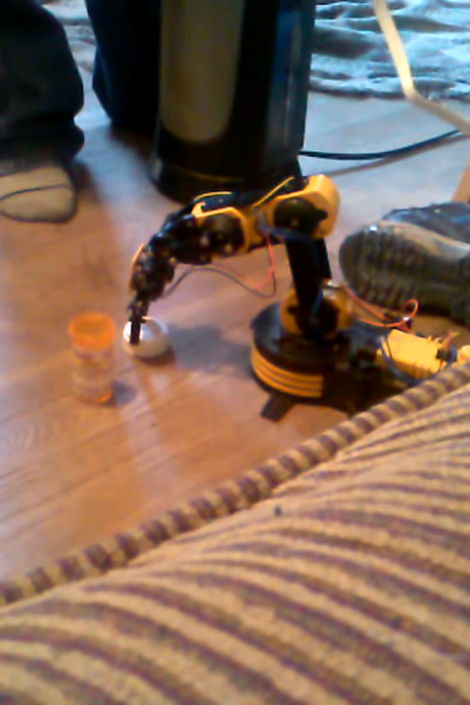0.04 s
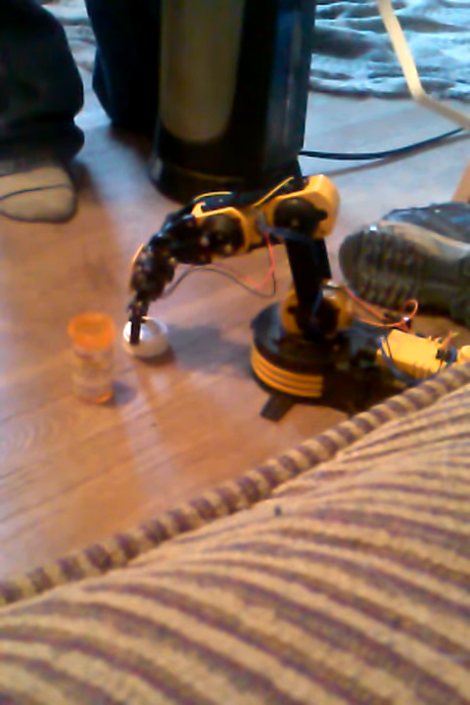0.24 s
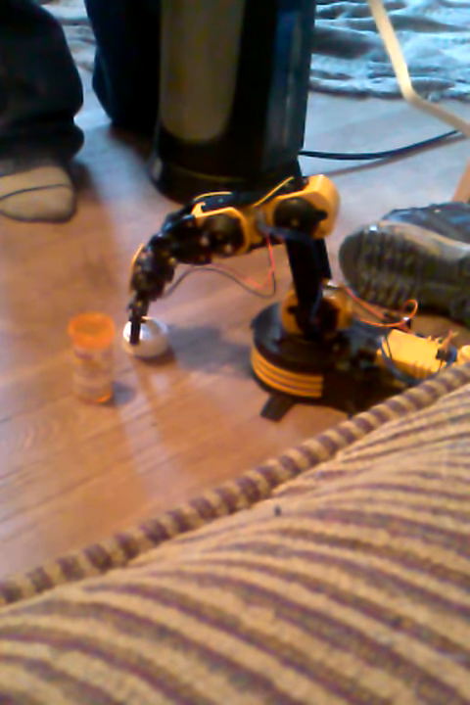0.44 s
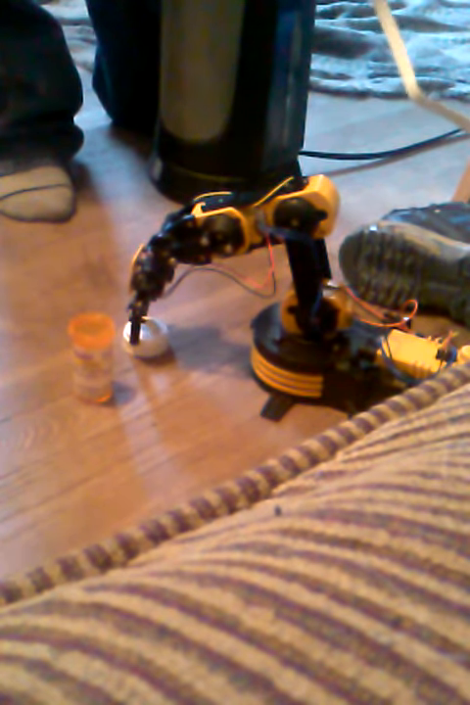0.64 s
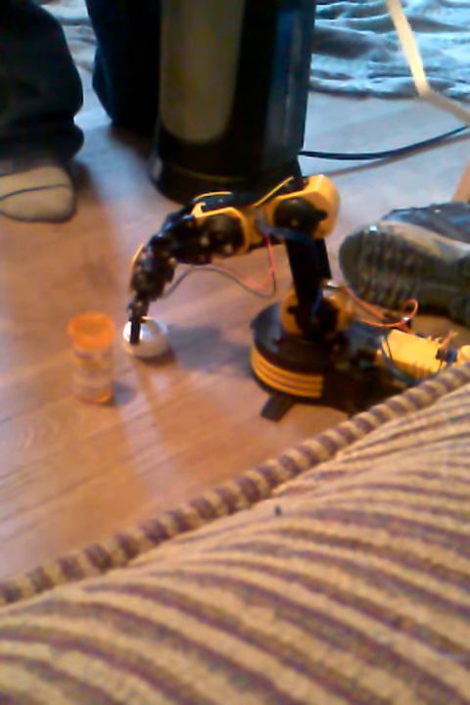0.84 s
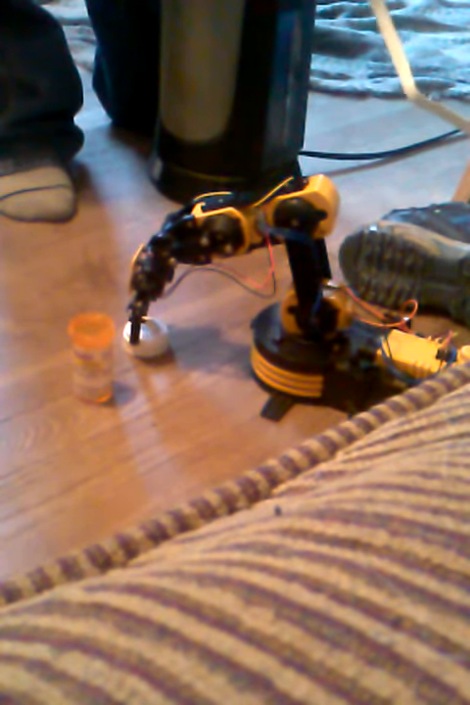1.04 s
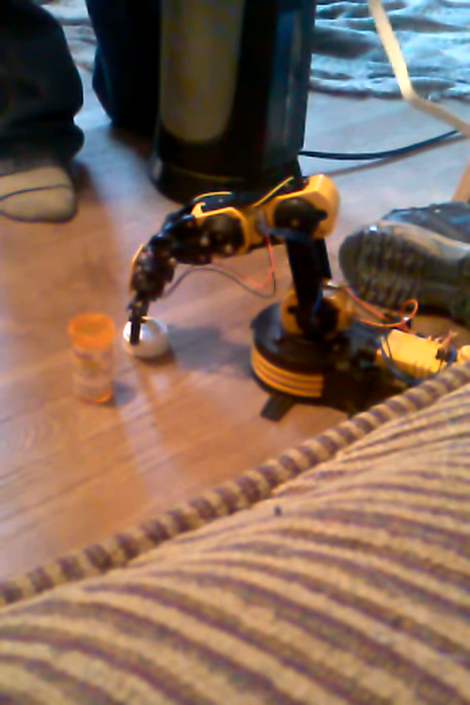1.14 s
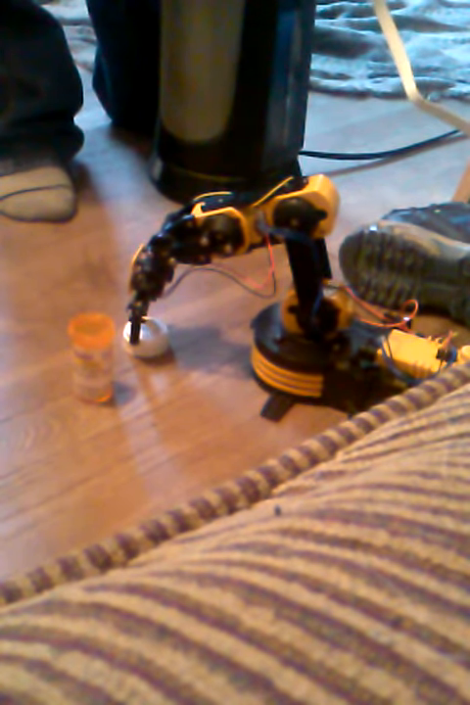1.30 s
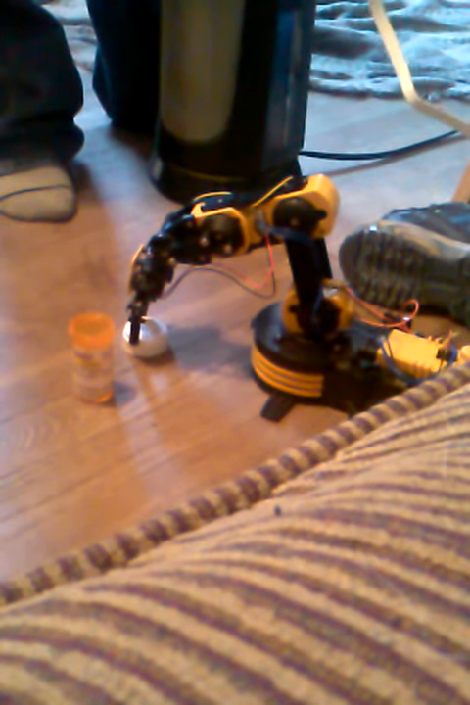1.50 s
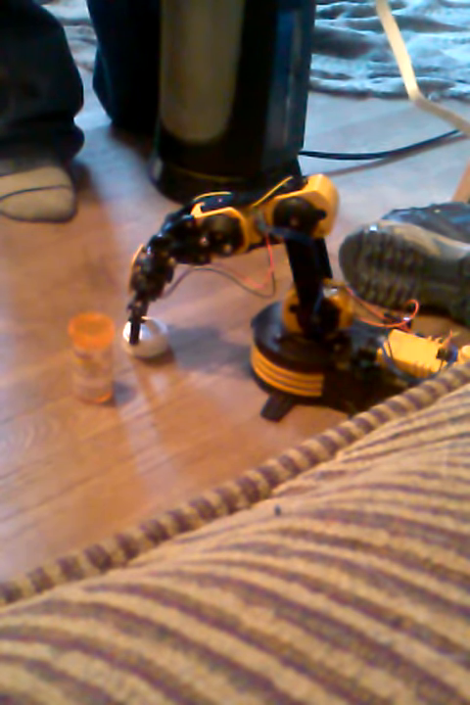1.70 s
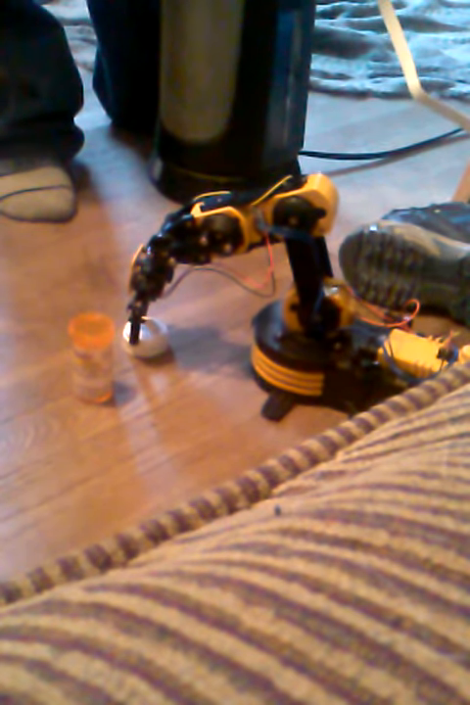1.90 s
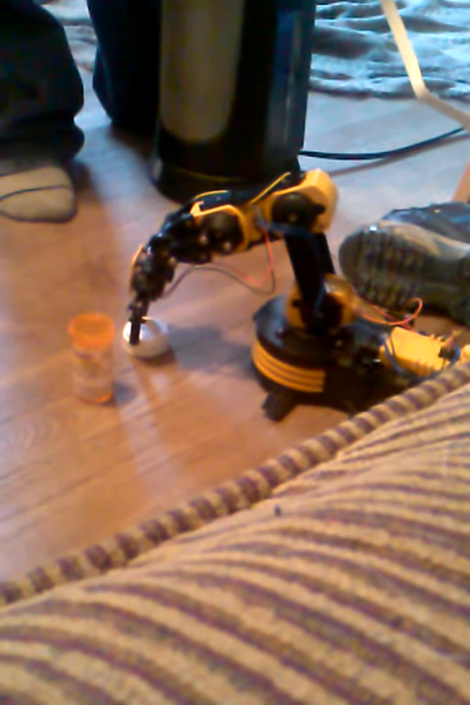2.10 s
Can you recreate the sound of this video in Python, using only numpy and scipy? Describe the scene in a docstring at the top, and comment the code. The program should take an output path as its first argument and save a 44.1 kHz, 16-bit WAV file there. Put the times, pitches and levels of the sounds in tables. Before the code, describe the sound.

Small plastic gearboxes buzz and rasp briefly, crack sharply once, pause, whir again with a knock and a tick, then start a third, whinier move; close, dry room, soft hand-held bumps and hum beneath.

```python
"""On a wooden floor in a room, a hobby robot arm makes three short moves: its plastic gearboxes rattle and rasp.
Random pushes make the gearboxes ring. During the first move a cluster of noise bursts makes a sharp plastic
snap, and the arm rings on. Short gear tones whine, most of all in the last move; small knocks are decaying noise.
Under it lie a steady mains hum tone and the uneven rumble, bumps and rustle of a hand-held camera."""
import sys
import numpy as np
from scipy import signal
from scipy.fft import rfft, irfft, next_fast_len
from scipy.io import wavfile
from scipy.ndimage import map_coordinates

SR = 44100
rng = np.random.default_rng(int(sys.argv[2]) if len(sys.argv) > 2 else 0)


def transcribe(u):
    """Save the signal u as a 16-bit wav file named by the first command-line argument.

    u: samples, shape (n,) or (channels, n), limited to [-1, 1]; the rate is SR.
    q: integer samples, one column per channel.
    """
    v = np.clip(np.atleast_2d(u).T, -1, 1)
    q = np.round(v * 32767).astype(np.int16)
    wavfile.write(sys.argv[1], SR, q)


N = 94815
T = np.arange(N) / SR  # time of each sample, s


def amp(db):
    """Turn decibels into a gain."""
    return 10 ** (np.asarray(db) / 20)


def unit(x):
    """Scale a sound to an rms of 1."""
    return x / np.sqrt(np.mean(x ** 2) + 1e-20)


def along(points, hz):
    """Read a table of (f/Hz, value) on a log frequency axis."""
    f, v = np.transpose(points)
    return np.interp(np.log(hz + 1), np.log(f + 1), v)


def wobble(rate):
    """A smooth random curve with rate random points a second."""
    points = rng.standard_normal(int(N * rate / SR) + 4)
    return map_coordinates(points, [T * rate])


def filtered(x, response):
    """Weigh each frequency of x by a response."""
    m = next_fast_len(N + SR // 2)
    return irfft(rfft(x, m) * response(np.fft.rfftfreq(m, 1 / SR)), m)[:N]


def noise(response):
    """Coloured noise with an rms of 1."""
    return unit(filtered(rng.standard_normal(N), response))


def coloured(points):
    """Noise whose colour follows a table of (f/Hz, level/dB)."""
    return noise(lambda f: amp(along(points, f)))


def ring(f, hz, width):
    """A resonance: it lets through a band around hz; squaring makes its sides steep."""
    return (1j * f * width / (hz * hz - f * f + 1j * f * width)) ** 2


RISE_S = 0.00025


def strike(s, t60):
    """Loudness of a blow at s: a fast rise, then a fall of 60 dB in t60 seconds."""
    age = np.maximum(T - s, 0)
    return (1 - np.exp(-age / RISE_S)) * amp(-60 * age / t60)


# how long the room's echo takes to fall by 60 dB: f/Hz, t60/s
ROOM_DECAY = [(300, 0.23), (3000, 0.27), (7000, 0.24), (15000, .22)]
ROOM_FADE_IN_S = 0.0082


def room(x):
    """The blurred echo of a furnished room: noise that fades in, then dies away at its own pace in each band."""
    hz, t, z = signal.stft(rng.standard_normal(SR // 2), SR, nperseg=256)
    fading = z * amp(-60 * t / along(ROOM_DECAY, hz)[:, None])
    tail = signal.istft(fading, SR, nperseg=256)[1]
    tail *= np.clip(T[:len(tail)] / ROOM_FADE_IN_S, 0, 1) ** 4
    return signal.fftconvolve(x, tail / np.linalg.norm(tail))[:N]


# strength of the steady handling noise before its flutter: t/s, level/dB
HANDLING_LEVEL = [(0, -54), (.15, -51.5), (.42, -55.5), (.68, -61), (.725, -66), (.77, -58.5), (.9, -56),
                  (.935, -63), (.965, -56.5), (1.07, -60.5), (1.18, -57), (1.28, -52), (1.61, -56.5),
                  (1.66, -65.5), (1.69, -58), (1.8, -58.5), (1.85, -57.5), (1.96, -54.5)]
FLUTTER_DB = 2


def handling_level():
    """The hand's changing grip as a gain that flutters at random."""
    db = np.interp(T, *np.transpose(HANDLING_LEVEL))
    return amp(db + FLUTTER_DB * wobble(45))


# bumps of the hand on the camera: t/s, level/dB
BUMPS = [(.1, -49), (.19, -47.5), (.25, -47), (0.384, -51), (.47, -48), (.495, -48.5), (0.564, -49.5),
         (.635, -47), (.84, -55), (0.891, -51), (.965, -50.5), (1.102, -47), (1.14, -55), (1.207, -49),
         (1.31, -43), (1.349, -46.5), (1.494, -48.5), (1.565, -49), (1.685, -52), (1.732, -52.5),
         (1.81, -49.5), (1.95, -47), (2.112, -46)]
# colour of a bump: f/Hz, level/dB
THUD_COLOUR = [(15, -7.5), (45, 1), (90, -6.5), (200, -17), (400, -28.5), (1500, -59.5), (8000, -90)]
# colour of the low rumble: f/Hz, level/dB
RUMBLE_COLOUR = [(20, -7), (45, -0.5), (100, -9), (200, -11), (350, -11.5), (600, -16.5), (980, -20.5),
                 (1200, -28.5), (1800, -28.5), (2600, -37.5), (6000, -43), (16000, -50.5)]
# colour of the faint rustle: f/Hz, level/dB
RUSTLE_COLOUR = [(200, -3.5), (2000, 5), (5000, -0.5), (7500, 5), (12000, 2), (16000, -0.5)]
BUMP_S, BUMP_SCUFF_DB = .012, -8  # bump length; extra rumble at each bump
RUSTLE_DB, RUSTLE_FOLLOWS = -70.5, .65  # rms; how closely it follows the rumble (1 = fully)


def handling(steady):
    """A hand rubs the camera: rumble swells at soft low bumps, and a faint rustle follows it."""
    bump_power = sum(amp(db) ** 2 * np.exp(-((T - s) / BUMP_S) ** 2) for s, db in BUMPS)
    level = np.sqrt(steady ** 2 + amp(BUMP_SCUFF_DB) ** 2 * bump_power)
    rumble = level * coloured(RUMBLE_COLOUR)
    thuds = np.sqrt(bump_power) * coloured(THUD_COLOUR)
    rustle = amp(RUSTLE_DB) * unit(level ** RUSTLE_FOLLOWS) * coloured(RUSTLE_COLOUR)
    return rumble + thuds + rustle


HUM_HZ, HUM_DB, HUM_FOLLOWS = 120.9, -60.5, 0.87  # pitch, rms, how closely it follows the handling


def hum(steady):
    """Mains hum: one steady pitch whose loudness wavers with the handling noise."""
    tone = np.sin(2 * np.pi * HUM_HZ * T)
    return amp(HUM_DB) * unit(steady ** HUM_FOLLOWS * tone)


# drive of each move, one list per move: t/s, level/dB
DRIVES = [
    [(.055, -77.5), (.08, -54), (.11, -47.5), (.2, -44.5), (.29, -60.5), (.38, -74.5), (.45, -72.5),
     (.49, -63.5), (.52, -80)],
    [(1.17, -77.5), (1.23, -56.5), (1.275, -43), (1.33, -41.5), (1.4, -44), (1.44, -50.5), (1.53, -57),
     (1.61, -60.5), (1.635, -82)],
    [(1.855, -78), (1.9, -57.5), (1.94, -45.5), (2, -41.5), (2.15, -41.5)],
]
# one row per move: base tooth rate f/Hz (half of it at full drive), gearbox ring f/Hz, its width f/Hz,
# ring of the moved link f/Hz, its width f/Hz, link level/dB at full drive against the gearbox ring
MOVES = [(690, 5820, 780, 4200, 450, -4), (650, 5580, 680, 3130, 420, -9),
         (498.8, 5720, 740, 3570, 460, -15.5)]
# further rings shared by all moves: f/Hz, width f/Hz, level/dB against the gearbox ring
SHELL_RINGS = [(2910, 220, -15), (4140, 400, -14), (6650, 400, -12.5)]
# colour of the broad rasp of the gears: f/Hz, level/dB
RASP_COLOUR = [(100, -26.5), (330, -12), (900, -10), (1200, -18), (2400, -23.5), (4700, -23.5), (7500, -21),
               (10000, -26.5), (15500, -34)]
TOOTH_JITTER, TOOTH_SCATTER_DB = .24, 5  # unevenness in timing (in teeth) and in strength
FRICTION, TEETH_PER_TURN = 0.79, 3.1  # friction noise against impacts; teeth in one slow pulse
SPEED_PER_DB = -0.3  # the tooth rate grows by this share of the base rate for each dB less drive
TEETH = 1600  # impacts per move, counted from time zero
LINK_FOLLOWS = .4  # extra dB lost by the link for each dB less drive


def gearboxes():
    """Sliding friction, with uneven tooth impacts in the first move, rings the gearbox and the link it moves."""
    out = np.zeros(N)
    for drive, move in zip(DRIVES, MOVES):
        rate, box_hz, box_width, link_hz, link_width, link_db = move
        db = np.interp(T, *np.transpose(drive), left=-120, right=-120)
        slack_db = db - db.max()
        speed = 0.5 + SPEED_PER_DB * slack_db + .006 * wobble(25)
        teeth = np.cumsum(rate * speed) / SR

        # the later two moves use up their impacts in the silence before them: only friction is heard there
        tooth = np.arange(TEETH) + TOOTH_JITTER * rng.standard_normal(TEETH)
        at = np.interp(tooth, teeth, np.arange(N), right=N).astype(int)
        strengths = amp(TOOTH_SCATTER_DB * rng.standard_normal(TEETH))
        impacts = np.bincount(at, strengths, N + 1)[:N]
        force = unit(unit(impacts) + FRICTION * rng.standard_normal(N))
        force *= 1 + .3 * np.sin(2 * np.pi * teeth / TEETH_PER_TURN)

        rings = [(box_hz, box_width, 0)] + SHELL_RINGS
        box = filtered(force, lambda f: np.linalg.norm([amp(g) * ring(f, hz, w) for hz, w, g in rings], axis=0))
        link = filtered(force, lambda f: abs(ring(f, link_hz, link_width)))
        link *= amp(link_db + LINK_FOLLOWS * slack_db)
        rasp = filtered(unit(room(force)), lambda f: amp(along(RASP_COLOUR, f)))
        out += amp(db) * (box + link + rasp) / np.std(box + rasp)
    return out


# contacts of the snap: t/s, level/dB, brightness in dB per octave above 2000 Hz
SNAP_CONTACTS = [(0.2058, -4, 8.5), (0.2062, -10, -7), (0.2077, -9, -3.5), (.2147, -18, 9.5),
                 (0.216, -7, 0), (0.2306, -16.5, -5.5)]
# colour of the cracking plastic: f/Hz, level/dB
PLASTIC_COLOUR = [(200, -35), (1000, -26), (1500, -18), (2450, -20), (3050, -3), (3750, -12), (4350, -3),
                  (5000, -2), (6100, 1.5), (7600, -1.5), (10000, -7), (13500, -24), (16000, -28)]
# tones of the arm ringing on: f/Hz, level/dB, time to fall by 60 dB t60/s
ARM_TONES = [(3026, -29, .24), (3140, -29, .22), (4400, -27, .13), (5190, -29, .2), (6052, -26, .2),
             (6580, -27, .17), (6980, -30, .22), (7660, -27, .22)]
SNAP_T60_S, SNAP_ROOM_DB = .016, -3.5


def snap():
    """Plastic slips and rebounds in a rapid cluster of cracks; the arm and the room ring on."""
    cracks = np.zeros(N)
    for s, db, tilt in SNAP_CONTACTS:
        def colour(f):
            octaves = np.log2(np.maximum(f, 2000) / 6000)
            return amp(along(PLASTIC_COLOUR, f) + tilt * octaves)
        cracks += amp(db) * strike(s, SNAP_T60_S) * noise(colour)
    first = SNAP_CONTACTS[0][0]
    arm = np.zeros(N)
    for hz, db, t60 in ARM_TONES:
        tone = np.sin(2 * np.pi * (hz * T + rng.random()))
        arm += amp(db) * strike(first, t60) * tone
    return cracks + arm + amp(SNAP_ROOM_DB) * room(cracks)


# brief gear tones: middle t/s, length t/s, pitch in the middle f/Hz, glide in Hz per s, level/dB before flutter
WHINES = [(.277, .032, 778, 0, -50), (1.953, .025, 1360, 300, -61), (1.952, .024, 905, 500, -55),
          (1.987, .023, 968, 900, -46), (1.985, .05, 2890, 600, -59), (2.02, .04, 1995, 200, -60),
          (2.08, .08, 990, 0, -59), (2.13, .13, 509, 40, -53), (2.11, .06, 3480, 300, -57),
          (2.1, .06, 3750, 300, -58)]
WHINE_WAVER, WHINE_FLUTTER_DB = 0.016, 2.5  # random changes of pitch (share) and of level


def whine():
    """Meshing gears sing in brief wavering tones; those with a glide rise in pitch."""
    out = np.zeros(N)
    for s, length, hz, glide, db in WHINES:
        pitch = (hz + glide * (T - s)) * (1 + WHINE_WAVER * wobble(160))
        tone = np.sin(2 * np.pi * np.cumsum(pitch) / SR)
        swell = np.exp(-((T - s) / length) ** 2)
        out += amp(db + WHINE_FLUTTER_DB * wobble(140)) * swell * tone
    return out


# small knocks and rattles of the joints: t/s, level/dB, centre f/Hz, width f/Hz, time to fall by 60 dB t60/s
KNOCKS = [(.383, -57, 5000, 7090, .35), (.466, -55, 4100, 600, .04), (.47, -59.5, 5987, 9000, 0.199),
          (.948, -60, 8500, 5000, 0.0399), (1.279, -42, 1350, 902, .055), (1.483, -50, 850, 400, 0.17),
          (1.6148, -41, 8300, 1810, .0055)]


def knocks():
    """Play in the joints gives small ticks and knocks: bursts of noise in one band."""
    out = np.zeros(N)
    for s, db, hz, width, t60 in KNOCKS:
        out += amp(db) * strike(s, t60) * noise(lambda f: ring(f, hz, width))
    return out


MOTOR_ROOM_DB, KNOCK_ROOM_DB = -11, -22  # how much of each goes into the echo


def scene():
    """The arm in its room, over the handling noise and the hum."""
    steady = handling_level()
    background = handling(steady) + hum(steady)
    motors, ticks = gearboxes(), knocks()
    echo = room(amp(MOTOR_ROOM_DB) * motors + amp(KNOCK_ROOM_DB) * ticks)
    return (background + motors + snap() + whine() + ticks + echo)[None]


FULL_SCALE, TOP_HZ = .88, 15820  # ceiling of the rounded peaks; upper band limit


def record(dry):
    """The camera rounds off the highest peaks, then keeps nothing above its band limit."""
    rounded = dry[0] / (1 + (dry[0] / FULL_SCALE) ** 8) ** (1 / 8)
    return filtered(rounded, lambda f: f < TOP_HZ)[None]


dry = scene()
out = record(dry)
transcribe(out)
```